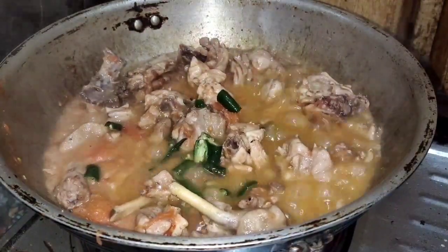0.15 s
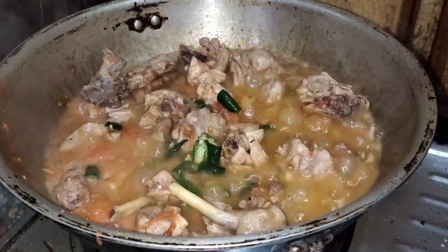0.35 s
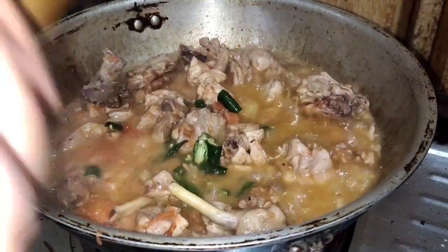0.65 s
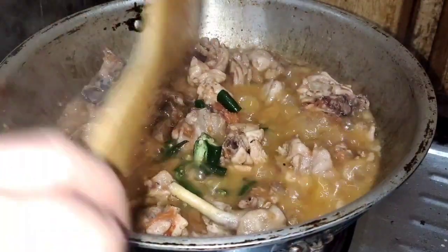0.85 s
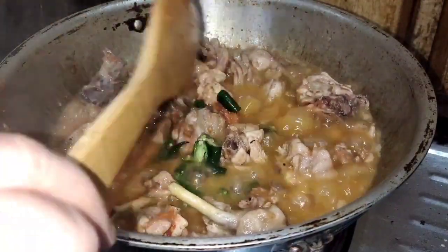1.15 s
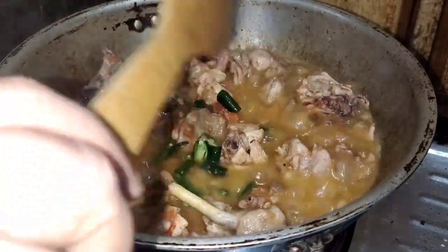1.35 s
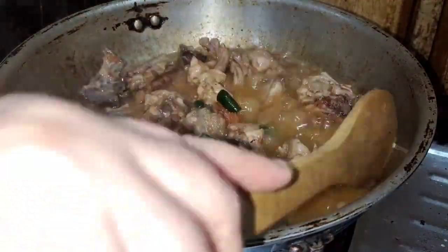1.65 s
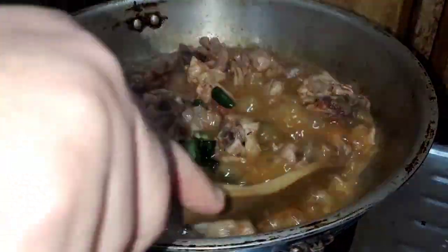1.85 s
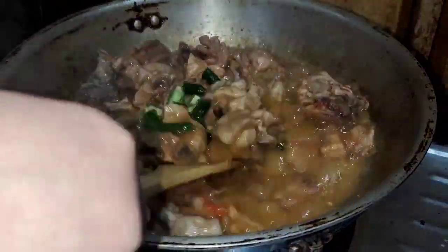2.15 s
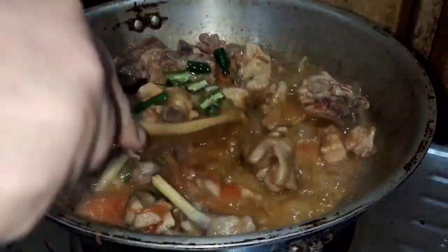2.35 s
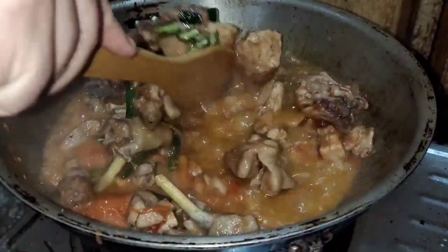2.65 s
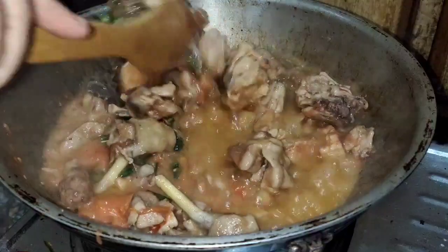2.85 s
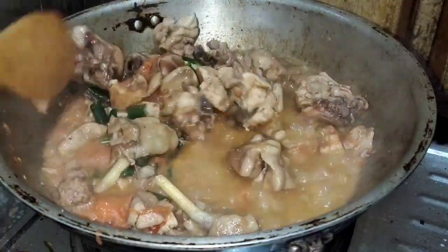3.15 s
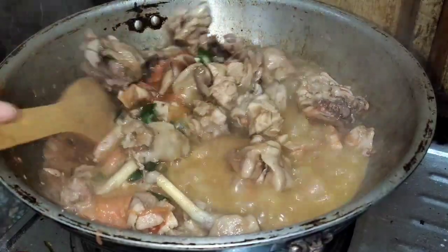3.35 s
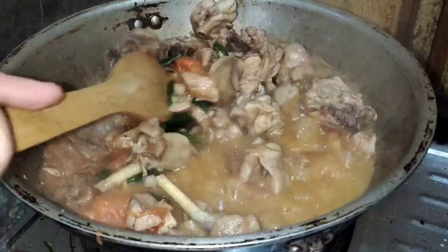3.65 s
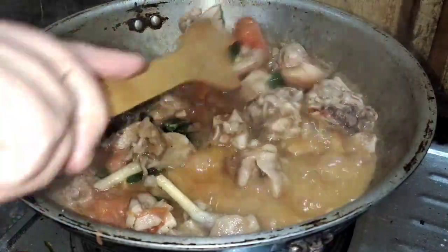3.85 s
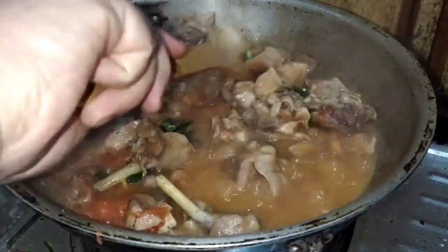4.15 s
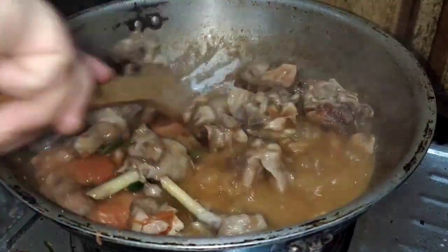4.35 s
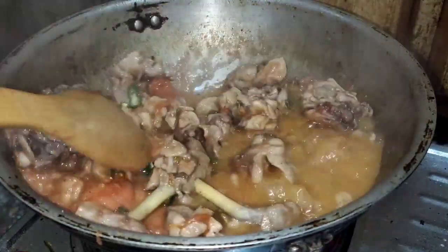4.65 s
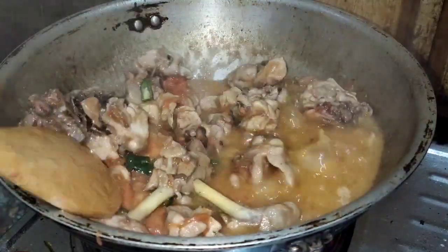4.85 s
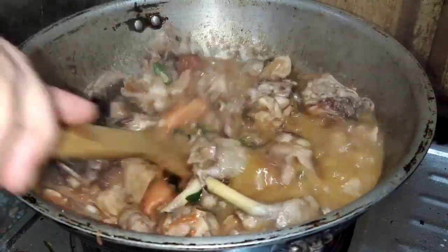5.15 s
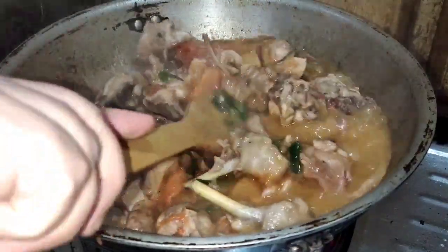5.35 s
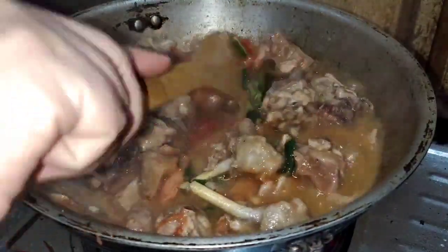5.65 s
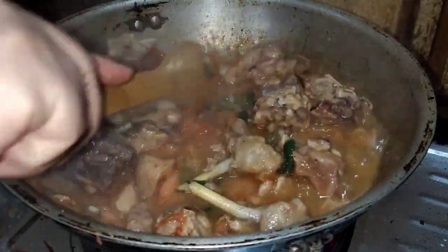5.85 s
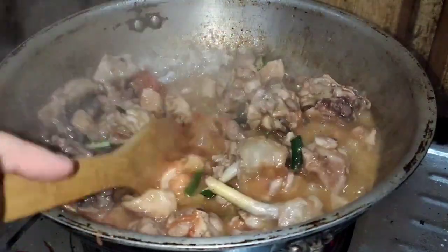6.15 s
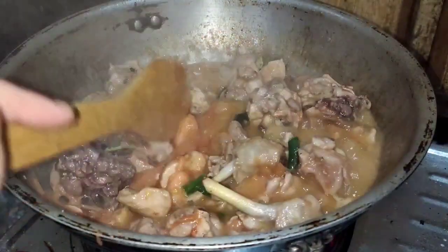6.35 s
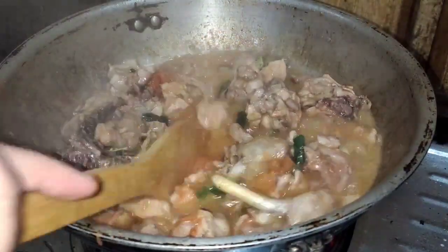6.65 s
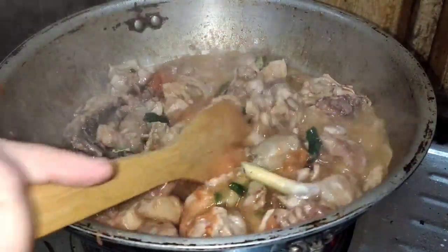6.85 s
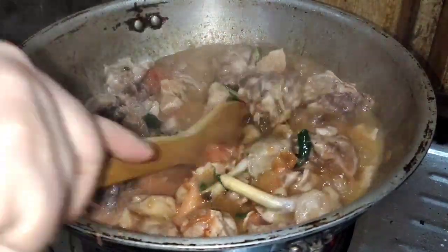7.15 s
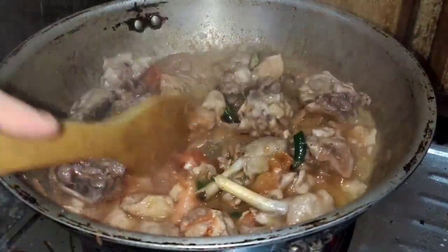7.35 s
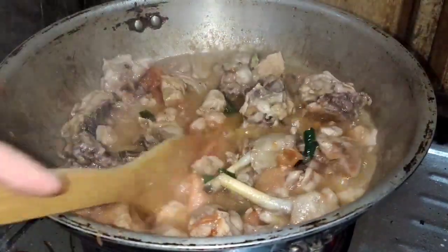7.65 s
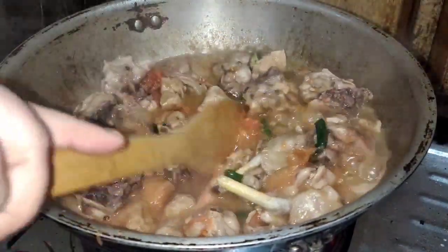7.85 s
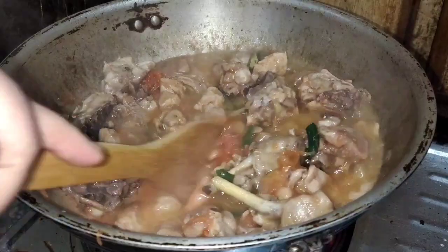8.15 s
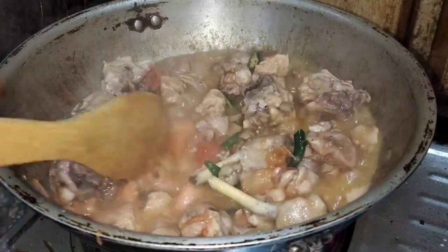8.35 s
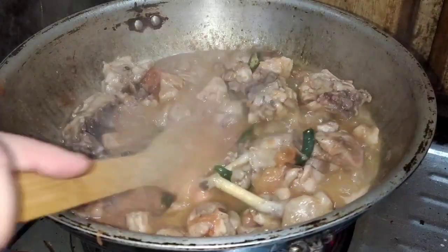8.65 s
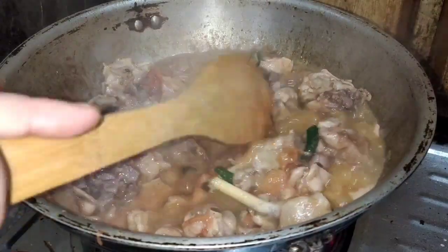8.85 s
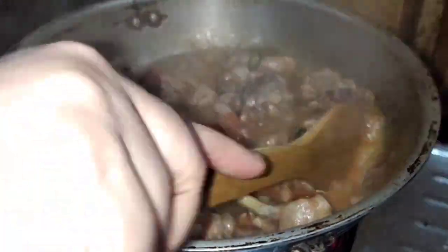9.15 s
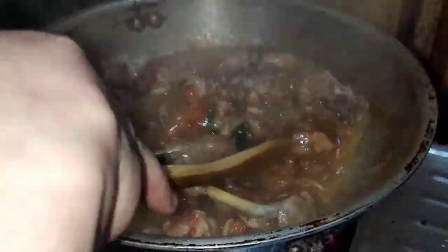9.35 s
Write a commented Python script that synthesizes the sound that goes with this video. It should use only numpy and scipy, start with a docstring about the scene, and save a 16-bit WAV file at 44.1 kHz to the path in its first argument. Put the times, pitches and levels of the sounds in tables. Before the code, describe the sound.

Close up in a small kitchen, thick gravy bubbles in a wide metal pan with short pitched blips over finer simmering and a faint burner hiss. A wooden spatula taps the edge, then drags through the food in strokes that raise bubbling and bright sizzle. Later come several dull knocks through the food, another sharp rim tap, and a last stir.

```python
"""Gravy simmering in a pan

Thick gravy bubbles in a wide metal pan close to a phone: short pitched pings with rough trails, over swarms of
finer bubbles. A wooden spatula drags (stick-slip ticks), bares hot metal that sizzles (shaped crackle), and
knocks on the pan (noise bands, ringing modes, a short kitchen tail). Drops spit; a burner hisses faintly."""
import sys
import numpy as np
from scipy import signal
from scipy.fft import rfft, irfft
from scipy.io import wavfile
from scipy.ndimage import uniform_filter1d

SR = 44100
rng = np.random.default_rng(int(sys.argv[2]) if len(sys.argv) > 2 else 0)


def dump(signal):
    """Clip the signal to [-1, 1] and save it as 16-bit WAV at the path in sys.argv[1]."""
    limited = np.clip(np.atleast_2d(signal).T, -1, 1)
    pcm = np.round(limited * 32767).astype(np.int16)
    wavfile.write(sys.argv[1], SR, pcm)


N = 419832
T = np.arange(N) / SR


def undb(db):
    """Decibels to amplitude gain."""
    return 10 ** (np.asarray(db) / 20)


def unit(x):
    """Scale to an RMS of 1."""
    return x / np.sqrt(np.mean(x ** 2))


def sides(left_minus_right_db):
    """Left and right gains whose mean is 1, as a column."""
    ratio = undb(left_minus_right_db)
    return np.array([2 * ratio / (1 + ratio), 2 / (1 + ratio)])[:, None]


def add(out, x, start_s):
    """Mix x into out from start_s on."""
    i = int(start_s * SR)
    out[:, i:i + x.shape[1]] += x[:, :N - i]


def colour(x, spectrum):
    """Shape the last axis by (freq_hz, level_db) points on a log frequency axis; RMS 1."""
    hz, db = np.transpose(spectrum)
    freq_hz = np.fft.rfftfreq(x.shape[-1], 1 / SR) + 1
    gain = undb(np.interp(np.log(freq_hz), np.log(hz), db))
    return unit(irfft(rfft(x) * gain, x.shape[-1]))


def band(x, hz, width_hz):
    """Band-pass around hz."""
    edges_hz = [max(hz - width_hz / 2, 20), min(hz + width_hz / 2, 20000)]
    return signal.sosfilt(signal.butter(3, edges_hz, "band", fs=SR, output="sos"), x)


def walk(rate_hz):
    """Random levels held 1 / rate_hz s and slewed twice."""
    k = int(SR / rate_hz)
    steps = np.repeat(rng.standard_normal(N // k + 1), k)
    return uniform_filter1d(uniform_filter1d(steps, k), k)[:N]


def patchy(x, spread_db, width_hz, length_s):
    """Narrow bands of each side swell and fade irregularly; RMS 1."""
    z = signal.stft(x, nperseg=512)[2]
    field = rng.standard_normal(z.shape)
    for _ in range(2):
        field = uniform_filter1d(field, max(int(width_hz * 512 / SR), 1), axis=1)
        field = uniform_filter1d(field, max(int(length_s * SR / 256), 1), axis=2)
    gain = undb(spread_db * np.clip(unit(field), -3, 1.8))
    return unit(signal.istft(z * gain, nperseg=512)[1][:, :N])


def crackle(rate_hz, spread_db, smooth_gain):
    """Dense tiny one-sample bursts over a share of smooth noise."""
    hit = rng.random((2, N)) < rate_hz / SR
    size = undb(spread_db * np.minimum(rng.exponential(size=(2, N)), 4))
    noise = rng.standard_normal((2, N))
    return unit(hit * size * np.sign(noise)) + smooth_gain * noise


POP_CYCLES, POP_MIN_S, POP_MAX_S = 8.9, 0.0038, 0.0237
TAIL_S = 0.059
TRAIL_CYCLES = 19  # phase memory of the trail, before a random factor


def pop(hz, tail_db):
    """A bubble swells and dies in a few cycles; a rough, narrow noise trail follows around its pitch."""
    length_s = np.clip(POP_CYCLES / hz, POP_MIN_S, POP_MAX_S)
    t = np.arange(7000) / SR
    turn = np.exp(2j * np.pi * hz * t)
    # envelope peaks at 1, half of length_s in
    ping = (2 * t / length_s) ** 4 * np.exp(4 - 8 * t / length_s) * turn.imag

    # size and phase of the trail wander, drawn twice a millisecond
    ms = np.arange(320) / 2
    noise = rng.standard_normal((3, len(ms))) + 1j * rng.standard_normal((3, len(ms)))
    # low pitches are more alike left and right
    pair = noise[1:] + min(500 / hz, 4) ** 2 * noise[0]
    memory_s = min(TRAIL_CYCLES * rng.uniform(.6, 1.6) / hz, POP_MAX_S)
    window = np.hanning(memory_s * 2000 + 2)
    # the trail's level varies irregularly
    level = undb(3.74 * unit(uniform_filter1d(rng.standard_normal(len(ms)), size=12)))
    trail = []
    for side in pair:
        wander = np.convolve(side, window, "same") * level
        trail.append((np.interp(t * 1000, ms, wander) * turn).real)
    fade = np.exp(-(t / TAIL_S) ** 2) * (1 - np.exp(-(t / length_s) ** 2))
    return ping + undb(tail_db) * unit(np.array(trail)) * fade


# Distinct bubbles and plops: start_s, pitch_hz, ping_level_db
BUBBLES = [(0.005, 1008, -51.5), (0.053, 986, -50.5), (0.06, 1920, -53), (0.088, 2240, -49),
           (0.098, 1500, -43.5), (0.15, 3730, -50), (0.207, 1133, -49.5), (0.226, 3380, -47.5),
           (0.254, 2105, -45.5), (0.226, 140, -67.5), (0.322, 1420, -54.5), (0.356, 2920, -49.5),
           (0.444, 1280, -48.5), (0.51, 2770, -50), (0.55, 2590, -44), (0.605, 586, -57),
           (0.708, 2000, -61), (0.775, 2776, -42.5), (0.791, 1140, -50.5), (0.866, 1140, -47),
           (1.03, 715, -51.5), (1.068, 1180, -42.5), (1.081, 2940, -49), (1.23, 2850, -48.5),
           (1.232, 1880, -57), (1.234, 1010, -55), (1.356, 1560, -53.5), (1.362, 823, -49),
           (1.404, 2860, -42), (1.49, 557, -51.5), (1.547, 1886, -43), (1.613, 1287, -43.5),
           (1.666, 2930, -34), (1.677, 1546, -44), (1.679, 507, -52), (1.698, 1903, -37),
           (1.798, 1050, -44.5), (1.829, 452, -45), (1.851, 3620, -44), (1.86, 1062, -40.5),
           (1.897, 224.5, -51), (1.916, 2560, -44.5), (1.922, 3170, -38.5), (1.946, 595, -42.5),
           (1.978, 1058, -41.5), (2.012, 1770, -46.5), (2.051, 1068, -48), (2.096, 1048, -51),
           (2.127, 2704, -41), (2.129, 3400, -46), (2.151, 1760, -57), (2.162, 2690, -43),
           (2.253, 3170, -36), (2.255, 1044, -51), (2.544, 1050, -54), (2.311, 1474, -42),
           (2.362, 3640, -44.5), (2.379, 1373, -42.5), (2.709, 1274, -45.5), (2.723, 2290, -41.5),
           (2.749, 2860, -43.5), (2.841, 2240, -46.5), (2.883, 227.7, -44.5), (2.91, 1440, -47.5),
           (2.949, 217, -53.5), (2.974, 1466, -52.5), (2.978, 2640, -38.5), (2.996, 3245, -38),
           (3.055, 1115, -45.5), (3.055, 577, -55), (3.134, 1075, -47), (3.142, 237.7, -46.5),
           (3.145, 628, -49), (3.165, 1650, -47), (3.187, 3420, -42), (3.194, 229, -54), (3.221, 1250, -55),
           (3.262, 1963, -51.5), (3.265, 830, -50.5), (3.292, 556, -51), (3.397, 1010, -56),
           (3.452, 2040, -44), (3.482, 1030, -47), (3.523, 2310, -43.5), (3.525, 2870, -50),
           (3.665, 2940, -48), (3.8, 1053, -52), (3.804, 2860, -39.5), (3.941, 1056, -44.5),
           (3.961, 1460, -41.5), (3.998, 1040, -44), (4.035, 1270, -41.5), (4.05, 611, -48),
           (4.06, 1064, -40.5), (4.08, 603, -43), (4.088, 3200, -37), (4.13, 1800, -31), (4.14, 1044, -39),
           (4.165, 1780, -37), (4.178, 2300, -36), (4.215, 1740, -37), (4.365, 1840, -60),
           (4.257, 214, -53.5), (4.445, 1000, -59), (4.5, 1000, -55), (4.738, 1000, -59),
           (4.552, 2820, -45.5), (4.643, 2420, -44), (4.646, 2740, -45), (4.665, 318, -52.5),
           (4.71, 291.5, -52), (4.745, 2915, -42), (4.775, 2790, -29.5), (4.919, 3420, -37.5),
           (4.943, 1350, -42), (4.956, 1920, -45), (4.961, 2940, -43.5), (4.976, 1010, -47.5),
           (4.998, 162, -56.5), (5.002, 628, -38), (5.027, 3100, -41), (5.138, 3100, -43),
           (5.17, 1335, -53.5), (5.246, 622, -54), (5.35, 3100, -58.5), (5.43, 3000, -50),
           (5.577, 488, -58.5), (5.768, 606, -60), (5.589, 4040, -47), (5.591, 3530, -43.5),
           (5.983, 454, -51.5), (6.027, 1453, -37), (6.044, 613, -47), (6.089, 2690, -39.5),
           (6.125, 1450, -49), (6.148, 1460, -49), (6.209, 2380, -37.5), (6.209, 600, -55.5),
           (6.251, 1246, -60), (6.315, 2970, -53), (6.339, 293, -58.5), (6.416, 601, -51.5),
           (6.4, 2740, -52), (6.43, 1930, -57), (6.469, 1760, -54), (6.475, 1940, -55), (6.494, 115, -66.5),
           (6.577, 2510, -43.5), (6.577, 1295, -53), (6.682, 1228, -42.5), (6.902, 1213, -41),
           (6.914, 2780, -44.5), (6.951, 1178, -42.5), (6.968, 1235, -45), (7.007, 3150, -42.5),
           (7.103, 2290, -38), (7.21, 487, -53.5), (7.211, 3020, -46), (7.22, 3060, -38),
           (7.222, 1602, -52), (7.224, 2480, -39), (7.254, 2470, -64), (7.364, 2950, -45.5),
           (7.62, 1360, -47), (7.691, 3500, -57), (7.755, 2640, -56.5), (7.811, 1010, -52),
           (7.89, 2930, -42), (7.987, 1430, -60), (7.989, 610, -64), (8.051, 615, -47.5),
           (8.082, 1395, -45.5), (8.123, 3000, -30.5), (8.246, 2500, -43), (8.278, 1860, -43.5),
           (8.279, 2600, -43.5), (8.53, 1460, -54), (8.58, 1910, -62), (8.589, 3370, -59),
           (8.65, 1375, -59), (8.695, 3500, -54.5), (8.74, 1280, -57), (9.031, 385, -53.5),
           (9.045, 1850, -39), (9.048, 2890, -43), (9.052, 3620, -43), (9.1, 3680, -41), (9.15, 1940, -47),
           (9.225, 3780, -45), (9.27, 3770, -47.5), (9.062, 1168, -43.5), (9.13, 1353, -46),
           (9.196, 4100, -44.5), (9.264, 262, -58), (9.321, 2970, -44.5), (9.464, 1870, -48.5)]
# Left-right balance of bubbles by pitch: pitch_hz, left_minus_right_db
BUBBLE_SIDES = [(250, 2.5), (600, -1), (1050, 20), (1300, 8), (1550, 4), (2000, -20.5), (2300, -13),
                (2600, 6.5), (3100, 14.5), (3800, 35)]
# Trail level at 1 kHz and -45 dB; weaker for higher and for louder bubbles
TRAIL_DB, TRAIL_DB_PER_OCTAVE, TRAIL_DB_PER_DB = -7.5, -4.5, -0.0944


def bubbles():
    """Bubbles large enough to be told apart, each a ping with its trail."""
    out = np.zeros((2, N))
    side_hz, side_db = np.transpose(BUBBLE_SIDES)
    for start_s, hz, level_db in BUBBLES:
        tail_db = TRAIL_DB + TRAIL_DB_PER_OCTAVE * np.log2(hz / 1000) + TRAIL_DB_PER_DB * (level_db + 45)
        gains = undb(level_db) * sides(np.interp(np.log(hz), np.log(side_hz), side_db))
        add(out, gains * pop(hz, tail_db), start_s)
    return out


def small_pops(count, centre_hz, octaves, db, spread_db, tail_db, side_db):
    """Lesser bubbles at random moments, pitches, sizes and left-right balances."""
    out = np.zeros((2, N))
    starts_s = rng.uniform(0, T[-1], count)
    for start_s, (pitch, size, place) in zip(starts_s, rng.standard_normal((count, 3))):
        gains = undb(db + spread_db * np.clip(size, -2, 1.5)) * sides(side_db + 2.9 * place)
        hz = centre_hz * 2 ** (octaves * np.clip(pitch, -2, 1.8))
        add(out, gains * pop(hz, tail_db), start_s)
    return out


def middle_bubbles(fine_gain):
    """Two swarms of mid-sized bubbles, louder when the fine simmer is."""
    wide = small_pops(count=520, centre_hz=1159.0, octaves=0.97, db=-66, spread_db=4.0, tail_db=0.0,
                      side_db=-1.5)
    narrow = small_pops(count=260, centre_hz=2046.0, octaves=0.29, db=-70.5, spread_db=5.5, tail_db=-3.0,
                        side_db=-8.5)
    return (wide + narrow) * (fine_gain / undb(-55.0)) ** 0.34


def deep_bubbles():
    """Sparse low plops near 120 Hz, at random moments."""
    return small_pops(count=60, centre_hz=122.0, octaves=0.21, db=-70.0, spread_db=8.5, tail_db=-10.5,
                      side_db=-6.0)


# Pot at rest: time_s, fine_simmer_db, sizzle_db
RESTING_POT = [(0.0, -50.5, -77), (0.2, -67, -75), (0.8, -62.5, -79), (1.35, -66, -70), (1.6, -56, -65.5),
               (2.2, -57, -83), (2.55, -65.5, -70), (3.7, -56.5, -69.5), (4.6, -62.5, -69.5),
               (5.2, -70, -71.5), (6.15, -56.5, -69.5), (6.581, -79, -82.5), (7.1, -86, -72),
               (7.95, -85, -84), (8.3, -56.5, -72.5), (8.851, -91, -78.5), (9.35, -72, -75),
               (9.52, -73, -98)]
# Stirring strokes: peak_s, rise_s, fall_s, drag_db, fine_simmer_db, sizzle_db, added_sizzle_top_db
STIR_STROKES = [(1.65, 0.069, 0.36, -64, -86, -98, -82), (2.08, 0.29, 0.68, -66.5, -96, -64.5, -67),
                (2.41, 0.051, 0.44, -78, -65, -103, -59), (2.76, 0.11, 0.12, -79, -67, -56.5, -57),
                (3.154, 0.071, 0.18, -54.5, -51.5, -54.5, -83), (3.65, 0.13, 0.17, -68.5, -62, -73, -55.5),
                (4.165, 0.16, 0.14, -42, -43.5, -47.5, -48), (4.93, 0.026, .19, -50.5, -58, -63.5, -75),
                (5.05, 0.069, 0.063, -85, -62, -56, -69), (5.78, 0.085, 0.12, -65, -51, -59.5, -47),
                (6.97, 0.12, 0.82, -74.5, -62.5, -80, -81), (9.055, 0.012, 0.13, -52.5, -51, -87, -71),
                (9.28, 0.19, 0.28, -67, -79, -59.5, -64)]


def stirring():
    """Gains of drag, fine simmer, sizzle and its top: strokes swell and fall over the resting pot."""
    time_s, *rest_db = np.transpose(RESTING_POT)
    rest = [undb(np.interp(T, time_s, db)) for db in rest_db]
    gains = np.array([0 * T] + rest + [0 * T])
    for peak_s, rise_s, fall_s, *levels_db in STIR_STROKES:
        width_s = np.where(T < peak_s, rise_s, fall_s)
        gains = gains + undb(levels_db)[:, None] * np.exp(-((T - peak_s) / width_s) ** 2)
    return gains


def fine_simmer(gain):
    """A swarm of fine bubbles near 3 kHz."""
    swarm = small_pops(count=1000, centre_hz=2907, octaves=0.11, db=0, spread_db=5.5, tail_db=-2.0,
                       side_db=13.0)
    return unit(swarm) * gain


# Sizzle colour: freq_hz, relative_density_db
SIZZLE_SPECTRUM = [(2350, -60), (4000, -7), (5700, -0.5), (6070, 2), (7310, 4.5), (8020, -1), (11400, -2.5),
                   (12500, 7), (14000, -12.5), (15400, -9.5)]
AIR_HZ = 11000  # the top of the sizzle starts here


def sizzle(gain, air_gain):
    """Juice on bare hot metal: dense bright crackle with patchy, flickering narrow bands."""
    bright = patchy(colour(crackle(2700, 3.7, 1.17), SIZZLE_SPECTRUM), 8, 220, 0.03) * sides(12.0)
    top = signal.sosfilt(signal.butter(4, AIR_HZ, "high", fs=SR, output="sos"), bright)
    return bright * gain + top * air_gain


# Burner colour: freq_hz, relative_density_db
BURNER_SPECTRUM = [(18, -60), (30, -36), (121, 2), (384, -4), (512, 0.5), (2120, -19.5), (2900, -12),
                   (3980, -10), (5740, -5), (12600, -20), (16000, -23)]
BURNER_DB = -68  # centre of the flicker


def burner():
    """Faint shaped noise that flickers a little; the bass is mostly alike left and right."""
    noise = colour(rng.standard_normal((3, N)), BURNER_SPECTRUM)
    low = signal.butter(1, 700, fs=SR, output="sos")
    pair = signal.sosfilt(low, noise[0]) + noise[1:] - .8 * signal.sosfilt(low, noise[1:])
    return patchy(pair, 1.5, 200, .04) * undb(BURNER_DB + 1.2 * walk(3)) * sides(2.5)


# Knock noise from thud to air: centre_hz, width_hz
NOISE_BANDS = [(300, 167), (640, 510), (1500, 670), (3300, 2700), (6300, 3760), (12000, 3400)]
# Pan modes: freq_hz
MODE_HZ = [145, 229, 293, 670, 1400, 1556, 1986, 2024, 2681, 2735, 3440, 3499, 4237, 4303, 4964, 5136, 6850,
           7752, 8882]
# Same modes: level_db, t60_s (before gravy damping), is_bottom (else wall)
MODE_RINGS = [(-1.5, 0.3, True), (4.5, 0.28, True), (2, 0.3, True), (1.5, 0.42, True), (-10, 0.4, False),
              (-6, 0.105, True), (-17.5, 1, False), (1.5, 0.58, False), (-7, 0.36, False),
              (-10, 0.43, False), (-17, 0.35, False), (-6, 0.39, False), (-12, 0.23, False),
              (-1, 0.089, False), (-8.5, 0.18, False), (-12, .2, False), (-6.5, 0.15, False),
              (-11.5, 0.13, False), (-16.5, 0.17, False)]
WALL_HZ = 2024  # main wall mode
KITCHEN_T60_S, KITCHEN_CUT_S = 0.7, 0.21  # the cut ends the tail sooner
RING_RISE_S, DAMPED_S = 0.019, .29  # the gravy stills the ring


def knock(bands_db, rise_s, rattle_s, ring_db, low_db, overtone_db_per_octave):
    """A knock rattles the pan on its stand, rings its modes and dies in the kitchen."""
    t = np.arange(SR // 2) / SR
    # dense short-lived modes: narrow bands stand out
    noise = patchy(rng.standard_normal((3, len(t))), 6.0, 130, .07)[:, :len(t)]
    kitchen = np.exp(-np.log(1000) * t / KITCHEN_T60_S - (t / KITCHEN_CUT_S) ** 4)
    # the rattle holds the level up before the room takes over
    rattle = .5 + np.exp(-(t / max(rattle_s, 1e-3)) ** 2)
    hold = np.minimum(t / rise_s, 1) * kitchen * rattle
    body = 0
    for (hz, width_hz), band_db in zip(NOISE_BANDS, bands_db):
        pair = noise[1:] + 900 / hz * noise[0]  # bass more alike on both sides
        body = body + undb(band_db) * unit(band(pair, hz, width_hz)) * np.exp(-t * hz / 900)

    ring = 0
    for hz, (mode_db, t60_s, bottom) in zip(MODE_HZ, MODE_RINGS):
        # each mode's level flutters irregularly
        wobble = unit(uniform_filter1d(rng.standard_normal((2, len(t))), 400))
        flutter = 1 + (.9 if bottom else .7) * np.tanh(wobble)
        wall_db = ring_db + overtone_db_per_octave * abs(np.log2(hz / WALL_HZ))
        size = undb(mode_db + (low_db if bottom else wall_db))
        phase = rng.uniform(0, min(hz / 700, 2.5), (2, 1))
        tone = np.sin(2 * np.pi * hz * t + phase)
        # main wall modes swell in; higher ones and the bottom speak sooner
        rise = 1 - np.exp(-t / RING_RISE_S * (4 if bottom else max(hz / WALL_HZ, 1) ** 2))
        ring = ring + size * flutter * rise * np.exp(-np.log(1000) * t / t60_s) * tone
    return hold * body + np.exp(-(t / DAMPED_S) ** 4) * ring


# Edge taps on the bare wall: start_s, level_db, crack_hz, crack_db, crack_fall_s, wall_ring_db,
# bottom_ring_db, wood_db, left_minus_right_db, lowpass_hz
EDGE_TAPS = [(1.448, -34.5, 2940, 20.5, 0.0033, -9, -24, 1, 1.5, 7670),
             (8.879, -35, 3570, 23.5, 0.0014, -6, -26, 0, 0.5, 4620)]
# Tap level per noise band: level_db
EDGE_BANDS_DB = [-26.5, -8.5, -7.5, 2, -44, -65]
# The spatula's own short notes: freq_hz, level_db
WOOD_NOTES = [(562, -2.5), (1750, -5.5)]
# Band that taps leave hollow: low_hz, high_hz
HOLLOW_HZ = [760, 1300]
TAP_RISE_S, TAP_RATTLE_S, TAP_OVERTONE_DB_PER_OCTAVE = 0.00061, 0.0092, 1.5
WOOD_S = 0.013  # fall of the first wood note; higher ones fall faster


def edge_taps():
    """The spatula's edge taps the bare wall: a pitched crack, short wood notes and a ringing knock."""
    out, t = np.zeros((2, N)), np.arange(SR // 2) / SR
    for start_s, db, crack_hz, crack_db, fall_s, ring_db, low_db, wood_db, side_db, top_hz in EDGE_TAPS:
        crack_shape = (1 - np.exp(-(t / TAP_RISE_S) ** 2)) * np.exp(-t / fall_s)
        tap = undb(crack_db) * crack_shape * np.sin(2 * np.pi * crack_hz * t)
        for hz, note_db in WOOD_NOTES:
            fall = np.exp(-t / WOOD_S * hz / WOOD_NOTES[0][0])
            tap = tap + undb(wood_db + note_db) * fall * np.sin(2 * np.pi * hz * t)
        tap = tap + knock(EDGE_BANDS_DB, TAP_RISE_S, TAP_RATTLE_S, ring_db, low_db, TAP_OVERTONE_DB_PER_OCTAVE)
        dull = signal.butter(8, top_hz, fs=SR, output="sos")
        hollow = signal.butter(2, HOLLOW_HZ, "bandstop", fs=SR, output="sos")
        add(out, undb(db) * sides(side_db) * signal.sosfilt(np.vstack([dull, hollow]), tap), start_s)
    return out


# Drag colour: freq_hz, relative_density_db
DRAG_SPECTRUM = [(90, -57), (230, -5.5), (380, -20.5), (610, 5), (770, -22), (1050, 10), (1300, 0),
                 (1900, -2), (3000, -3), (4500, -10.5), (7000, -24)]


def drags(gain):
    """Stick-slip ticks of the wooden edge, coloured by spatula and pan."""
    ticks = crackle(1800, 4.5, 0.95)
    shared = ticks + 0.7 * ticks[::-1]  # each side also carries some of the other
    ticks = patchy(colour(shared, DRAG_SPECTRUM), 5, 200, 0.028)
    # the edge catches and lets go
    return gain * undb(4.2 * walk(60)) * ticks * sides(0.97)


# Drops that spit off the hot wall: start_s, level_db
SPITTING_DROPS = [(2.224, -67), (2.391, -60), (2.9542, -57.5), (4.059, -58), (5.371, -55.5), (6.922, -58),
                  (9.309, -58)]
SPIT_CLICK_S, SPIT_HISS_S, SPIT_HISS_DB = 0.0025, 0.024, 0.5


def spits():
    """A bright click and a short hiss, coloured like the sizzle."""
    out, t = np.zeros((2, N)), np.arange(SR // 5) / SR
    shape = np.exp(-t / SPIT_CLICK_S) + undb(SPIT_HISS_DB) * np.exp(-t / SPIT_HISS_S)
    for start_s, db in SPITTING_DROPS:
        noise = colour(rng.standard_normal((2, len(t))), SIZZLE_SPECTRUM)
        add(out, undb(db) * shape * noise * sides(3.0), start_s)
    return out


# Flat blows through the food: start_s, level_db, thud_db, clack_db, dull_above_hz, rattle_s,
# wall_ring_db, bottom_ring_db, left_minus_right_db
FLAT_BLOWS = [(5.819, -35.5, -18, -11, 1420, 0.094, -45, -11, 0),
              (7.46, -45.5, -5, -13, 10500, 0.36, 14.5, 2.5, 1.5),
              (7.828, -39, -4, -1.5, 2770, 0.064, -17, -1, 0.5),
              (8.368, -39, -3, 0.5, 8900, 0.09, -28, -4, 1.5)]
# Blow level per noise band, before thud, clack and dulling: level_db
FLAT_BANDS_DB = [4.5, 1.5, 4.5, -2.5, -2, -1]
BLOW_RISE_S, BLOW_OVERTONE_DB_PER_OCTAVE, BLOW_DULL_DB_PER_OCTAVE = 0.001, -1, -24


def flat_blows():
    """The flat of the spatula thuds through the food, duller the more food cushions it."""
    out, hz = np.zeros((2, N)), np.array(NOISE_BANDS)[:, 0]
    for start_s, db, thud_db, clack_db, dull_hz, rattle_s, ring_db, low_db, side_db in FLAT_BLOWS:
        dull_db = BLOW_DULL_DB_PER_OCTAVE * np.maximum(np.log2(hz / dull_hz), 0)
        bands_db = FLAT_BANDS_DB + dull_db + np.array([thud_db, 0, clack_db, 0, 0, 0])
        blow = knock(bands_db, BLOW_RISE_S, rattle_s, ring_db, low_db, BLOW_OVERTONE_DB_PER_OCTAVE)
        add(out, undb(db) * sides(side_db) * blow, start_s)
    return out


def scene():
    """Sum of all layers; stirring sets the changing gains."""
    drag_gain, fine_gain, sizzle_gain, air_gain = stirring()
    pot = bubbles() + middle_bubbles(fine_gain) + deep_bubbles() + fine_simmer(fine_gain)
    heat = sizzle(sizzle_gain, air_gain) + burner() + spits()
    spatula = edge_taps() + drags(drag_gain) + flat_blows()
    return pot + heat + spatula


TOP_HZ = 15500


def record(dry):
    """The deepest bass, below about 50 Hz, is thinned; the phone cuts the top."""
    dry = signal.sosfilt(signal.butter(2, 50, "high", fs=SR, output="sos"), dry)
    return signal.sosfilt(signal.ellip(8, .2, 60, TOP_HZ, fs=SR, output="sos"), dry)


dry = scene()
out = record(dry)
dump(out)
```